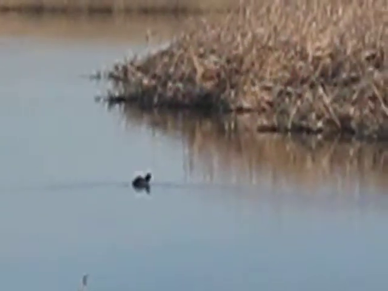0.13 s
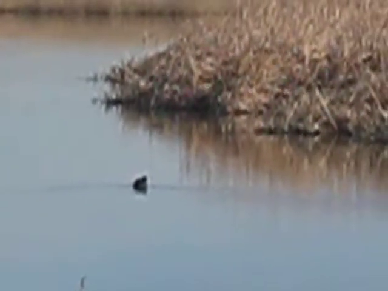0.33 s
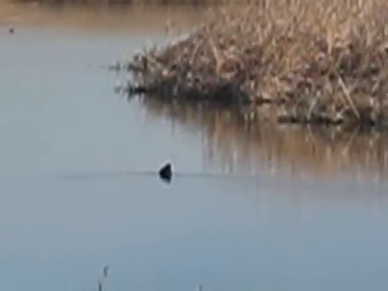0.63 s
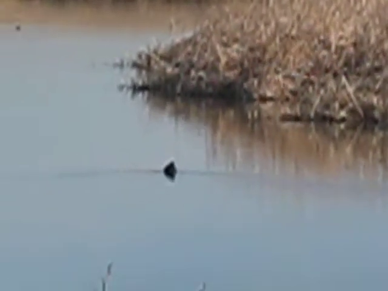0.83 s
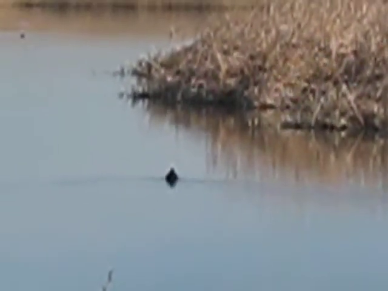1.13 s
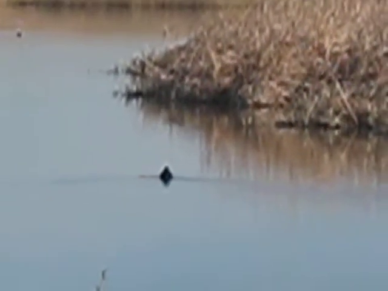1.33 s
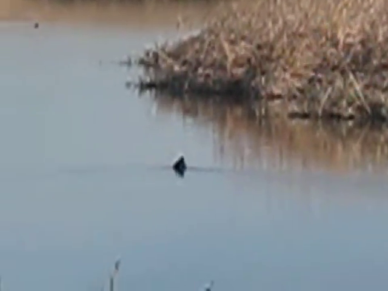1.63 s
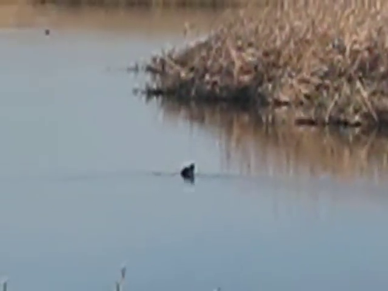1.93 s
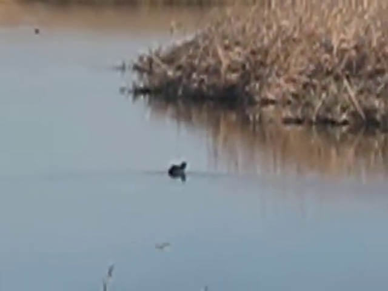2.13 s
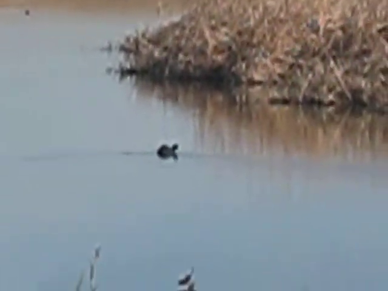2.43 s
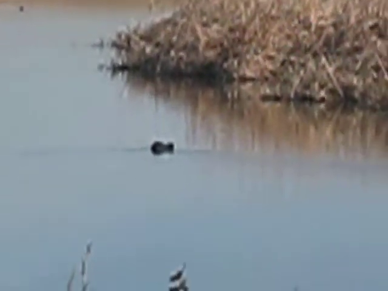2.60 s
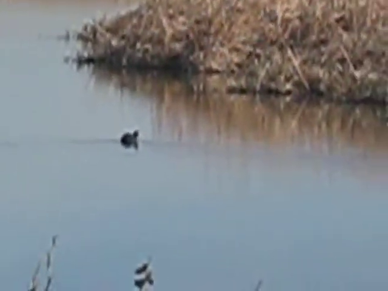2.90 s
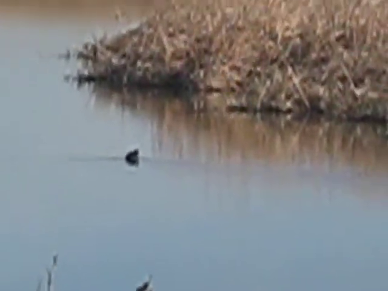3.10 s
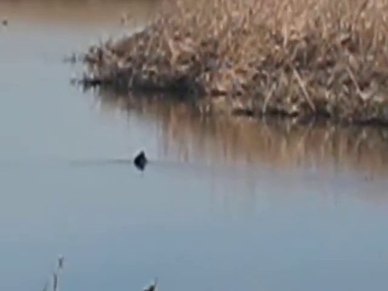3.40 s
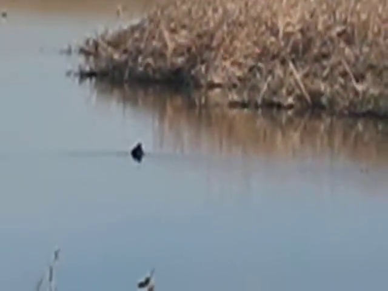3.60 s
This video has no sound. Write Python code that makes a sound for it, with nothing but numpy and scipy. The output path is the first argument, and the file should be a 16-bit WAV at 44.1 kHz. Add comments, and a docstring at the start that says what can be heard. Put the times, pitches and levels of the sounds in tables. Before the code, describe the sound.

A coot gives one short, hoarse call at about 2.5 seconds, falling in pitch and leaving a faint echo from the reed banks. Earlier, during the first 1.5 seconds, a distant waterbird gives faint, quick chirps in pairs. Throughout, until the end near 4 seconds, light gusts make a hollow rumble at the microphone, over a low wavering hum and a thin steady hiss.

```python
"""On open water, a coot gives one short, hoarse, falling call that echoes off the water and the reed bank. Its
voice is a stack of shaky tones mixed with a rasp of air. Another waterbird chirps faintly far away. Light gusts
make a hollow rumble at the microphone, over a low wavering hum and a thin steady hiss."""
import sys
import numpy as np
from scipy import signal
from scipy.fft import rfft, irfft, next_fast_len
from scipy.io import wavfile
from scipy.ndimage import map_coordinates

SR = 44100
rng = np.random.default_rng(int(sys.argv[2]) if len(sys.argv) > 2 else 0)


def output_pcm(signal):
    """Save a mono or channel-first signal as 16-bit PCM at the path in sys.argv[1].

    Samples are clipped to [-1, 1] before scaling.
    """
    pcm = np.clip(np.atleast_2d(signal).T, -1, 1) * 32767
    wavfile.write(sys.argv[1], SR, np.round(pcm).astype(np.int16))


N = 165375
TOP_HZ = 15780  # nothing higher than this is heard


def coot():
    """A falling voice of hoarse harmonics (multiples of the pitch), with air let through once a cycle."""
    # The voice's fall. Each row: time in seconds, pitch in Hz.
    pitch = [(2.502, 1195), (2.513, 1285), (2.523, 1205), (2.537, 1281), (2.548, 1261), (2.558, 1199),
             (2.572, 1229), (2.586, 1168), (2.6, 1196), (2.618, 1090), (2.627, 1102), (2.64, 1038),
             (2.649, 1084)]
    # How harmonics 1, 2 and 3 flutter. Each row: time in seconds, level in dB before a small trim.
    first = [(2.503, -32.5), (2.51, -27), (2.516, -39), (2.523, -19.5), (2.533, -35.5), (2.539, -19.5),
             (2.55, -52), (2.556, -21), (2.566, -42), (2.574, -29.5), (2.586, -24), (2.594, -27.5),
             (2.61, -23.5), (2.63, -42), (2.636, -35), (2.646, -43)]
    second = [(2.503, -32.5), (2.513, -27.5), (2.528, -40), (2.538, -40), (2.578, -46), (2.585, -33),
              (2.599, -49), (2.607, -33.5), (2.614, -27), (2.619, -43), (2.626, -27), (2.63, -43),
              (2.638, -29), (2.646, -29.5)]
    third = [(2.503, -52), (2.521, -59), (2.536, -43.5), (2.549, -64), (2.557, -43), (2.565, -64),
             (2.573, -52), (2.599, -56), (2.608, -60), (2.617, -48), (2.627, -66), (2.642, -46)]
    # The highest harmonics. Each row: harmonic number, dB added to upper_db.
    upper = [(4, -13), (5, -16.5)]
    # How much noise shakes each harmonic, lowest first.
    hoarseness = [.2, .45, .6, .55, .6]
    # The rasp of air. Each row: time in seconds, level in dB.
    rasp_levels = [(2.502, -39), (2.515, -45), (2.545, -53), (2.563, -48), (2.58, -47), (2.598, -45),
                   (2.62, -48), (2.64, -47)]
    # Harsh catches that open and close the call. Each row: time in seconds, level in dB.
    catch_peaks = [(2.503, -47), (2.641, -43)]
    # The tone colours of rasp and catches. Each row: frequency in Hz, relative level in dB.
    rasp_colour = [(500, -40), (1000, 3), (1550, 2), (2200, 11), (3000, -18), (4000, -14), (6000, -20),
                   (9000, -27)]
    catch_colour = [(700, -28), (1500, 2.5), (2100, 4), (3200, -10), (4100, -7), (5200, -13), (6500, -16),
                    (9000, -37)]
    start_s, end_s, attack_s, release_s, catch_width_s = 2.501, 2.649, .003, .0048, .0055
    jitter, shimmer_db, shakes_per_s, hoarse_per_s = .0162, .4, 260, 300
    t = clock()
    fade = np.clip((t - start_s) / attack_s, 0, 1) * np.clip((end_s - t) / release_s, 0, 1)
    phase = cycles(curves(pitch)[0] * (1 + jitter * wobble(shakes_per_s)))
    upper_db = -43 - 110 * np.maximum(t - start_s, 0)  # the call grows duller as it falls
    levels = [curves(first)[0] - 1, curves(second)[0] - 1.5, curves(third)[0] + .5]
    levels += [upper_db + db for _, db in upper]
    voice = np.zeros(N)
    for k, (db, share) in enumerate(zip(levels, hoarseness), 1):
        # The angle of this random number shakes the phase; its size shakes the level.
        shake = 1 + share * (wobble(hoarse_per_s) + 1j * wobble(hoarse_per_s))
        harmonic = tone(k * phase + np.angle(shake), db + shimmer_db * wobble(shakes_per_s))
        voice += np.abs(shake) ** .4 * harmonic
    air_pulses = unit(noise(rasp_colour) * (1 + .5 * np.cos(phase)))
    rasp = amp(curves(rasp_levels)[0]) * air_pulses
    catches = sum(amp(db) * np.exp(-.5 * ((t - s) / catch_width_s) ** 2) for s, db in catch_peaks)
    return fade * (voice + rasp + catches * noise(catch_colour))


def far_bird():
    """A distant bird gives short chirps whose pitch arches up and down."""
    # The chirps. Each row: middle in seconds, top pitch in Hz, base level in dB.
    chirps = [(.165, 1246, -54.5), (.284, 1240, -57.5), (.521, 1247, -57), (.65, 1282, -62),
              (.905, 1253, -59), (1.045, 1280, -64), (1.345, 1126, -62), (1.48, 910, -65)]
    # The tones in a chirp. Each row: harmonic number, dB added to the base level.
    harmonics = [(1, -8), (2, -4), (3, -10)]
    half_length_s, sag = .014, .055  # sag: share of pitch lost that far from the middle
    out = np.zeros(N)
    for middle_s, top_hz, level in chirps:
        away = ((clock() - middle_s) / half_length_s) ** 2
        swell = np.exp(-.5 * away)
        phase = cycles(top_hz * (1 - sag * np.minimum(away, 10)))
        out += swell * sum(tone(round(k) * phase, level + db) for k, db in harmonics)
    return out


def water_and_bank_echoes(sound):
    """The water close by and a far reed bank scatter the sound back; the treble dies first."""
    # The water and the far bank. Each row: delay in seconds, level in dB, treble limit in Hz.
    banks = [(0.011, -12, 4500), (.25, -25.5, 1100)]
    # How long an echo lasts. Each row: frequency in Hz, seconds to fade by 60 dB.
    fade_times = [(500, .6), (1200, .6), (2100, .29), (5000, .2)]
    out = np.zeros(N)
    for delay_s, level_db, limit_hz in banks:
        bands_hz, t, scatter = signal.stft(rng.standard_normal(SR), SR, nperseg=256)
        fade = amp(-60 * t / along(fade_times, bands_hz)[:, None])
        tail = signal.istft(scatter * fade, SR, nperseg=256)[1]
        delayed_tail = np.pad(tail / np.linalg.norm(tail), (int(delay_s * SR), 0))
        dulled = filtered(sound, lambda hz: 1 / np.hypot(1, (hz / limit_hz) ** 2))
        out += amp(level_db) * signal.fftconvolve(dulled, delayed_tail)[:N]
    return out


def wind():
    """Gusts swell in three hollow resonances over a steady bed of air."""
    # Where the resonances drift. Each row: time in seconds, then low, middle and high centre in Hz.
    centres = [(0, 323.5, 628, 719), (.2, 350, 615, 738), (.65, 279.9, 600, 850), (.85, 320.8, 592.3, 897),
               (1.149, 279.9, 585, 893.3), (1.5, 307.1, 567.5, 855.6), (2.3, 290, 568, 808),
               (3.3, 290.2, 535, 784.5), (3.75, 284.5, 515, 770)]
    # Their widths in Hz, from low to high.
    widths = [139, 146, 174]
    # The strength of each one. Each row: time in seconds, level in dB before a small trim.
    rumble = [(0.0, -37), (0.65, -42.5), (0.83, -30), (0.99, -42), (1.12, -34.5), (1.3, -39), (1.45, -31.5),
              (1.95, -39), (2.6, -35.5), (3.44, -34.5), (3.5, -42.5), (3.59, -33.5), (3.75, -33.5)]
    gust = [(0.0, -43), (0.09, -49.5), (0.17, -34.5), (0.27, -43.5), (0.71, -48), (0.88, -30.5),
            (0.92, -40.5), (1.07, -30), (1.28, -45.5), (1.5, -30.5), (1.73, -45), (1.93, -37.5),
            (2.1, -44.5), (2.15, -37.5), (2.78, -43), (2.83, -34.5), (3.07, -45), (3.34, -30.5),
            (3.43, -42), (3.75, -32)]
    whistle = [(0.0, -63), (0.29, -56), (0.63, -59), (1.11, -42.5), (1.34, -56.5), (1.46, -44), (3.04, -49),
               (3.08, -41.5), (3.64, -43), (3.75, -46.5)]
    # The steady air. Each row: frequency in Hz, relative level in dB.
    air_colour = [(20, -18), (40, -4), (62, -6.5), (85, 0), (130, -2), (200, 3), (400, -11.5), (700, -5.5),
                  (1000, -13.5), (1250, -16.5), (1500, -29.5), (2500, -39)]
    air_db, flutter_db = -43, .72
    levels = [curves(rumble)[0] + .5, curves(gust)[0] - .5, curves(whistle)[0] - 1.5]
    gusts = sum(resonance(hz, width) * amp(db + flutter_db * wobble(per_s=12))
                for hz, width, db in zip(curves(centres), widths, levels))
    return gusts + amp(air_db) * noise(air_colour)


def resonance(centre_hz, width_hz):
    """A hollow ring: a narrow band of noise around a moving centre, with the deep bass turned down."""
    narrow = lambda hz: 1 / (1 + (2 * hz / width_hz) ** 2)
    slow_a, slow_b = [filtered(rng.standard_normal(N), narrow) for _ in range(2)]
    phase = cycles(centre_hz)
    ring = slow_a * np.cos(phase) + slow_b * np.sin(phase)
    bass_cut_hz = centre_hz.mean() / 2
    return unit(filtered(ring, lambda hz: hz ** 2 / np.hypot(hz ** 2, bass_cut_hz ** 2)))


def hum():
    """A low wavering hum with a weak tone an octave below."""
    # The hum's course. Each row: time in seconds, pitch in Hz, level in dB.
    course = [(0, 135, -46), (.2, 138, -42.5), (.5, 130, -48.5), (.68, 131, -40), (.8, 130, -69),
              (1.08, 127, -48.5), (1.17, 127, -44.5), (1.9, 129, -49.5), (2.8, 128, -48),
              (3.75, 129, -47.5)]
    hz, db = curves(course)
    phase = cycles(hz * (1 + .013 * wobble(per_s=18)))
    db = db + .73 * wobble(per_s=12)
    return tone(phase, db) + tone(phase / 2, db - 11.5)


def hiss():
    """A thin steady hiss with a faint regular ticking at the very top."""
    # The hiss's tone colour. Each row: frequency in Hz, relative level in dB.
    colour = [(300, -10), (1500, 11.5), (2500, 10), (4000, 7), (6000, 5), (7200, 4.5), (9000, 0.5),
              (11000, -0.5), (14000, -8.5), (15500, -7.5)]
    hiss_db, fizz_db = -58, -65.5
    ticks_per_s, decay_s, spread_db = 30, .002, 1.2
    since_tick = clock() % (1 / ticks_per_s)
    ticks = np.exp(-since_tick / decay_s) * amp(spread_db * wobble(ticks_per_s))
    fizz = unit(ticks * noise([(7000, -12), (14000, -6), (TOP_HZ, 0)]))
    return amp(hiss_db) * noise(colour) + amp(fizz_db) * fizz


def amp(db):
    """Turn decibels into a number to multiply by."""
    return 10 ** (np.asarray(db) / 20)


def unit(x):
    """Scale a sound to an average strength (rms) of 1."""
    return x / np.sqrt(np.mean(x ** 2) + 1e-20)


def along(points, hz):
    """Read between (Hz, value) points, with octaves evenly spaced."""
    frequencies, values = np.transpose(points)
    return np.interp(np.log(hz + 1), np.log(frequencies + 1), values)


def clock():
    """The time of every sample in seconds."""
    return np.arange(N) / SR


def curves(rows):
    """Join the rows with straight lines: one curve for each column after the time."""
    times, *columns = np.transpose(rows)
    return [np.interp(clock(), times, column) for column in columns]


def wobble(per_s):
    """A smooth curve through per_s random values a second."""
    return map_coordinates(rng.standard_normal(N // 8), [clock() * per_s], mode="wrap")


def filtered(x, response):
    """Turn each frequency in x up or down by response(hz)."""
    size = next_fast_len(N + SR // 2)
    return irfft(rfft(x, size) * response(np.fft.rfftfreq(size, 1 / SR)), size)[:N]


def noise(colour):
    """Noise of strength 1, shaped by (Hz, dB) points."""
    return unit(filtered(rng.standard_normal(N), lambda hz: amp(along(colour, hz))))


def cycles(hz):
    """The phase of a changing pitch: how far its wave has turned, in radians."""
    return 2 * np.pi * np.cumsum(hz) / SR


def tone(phase, db):
    """A pure tone with the given average (rms) level."""
    return np.sqrt(2) * amp(db) * np.sin(phase)


def scene():
    """Birds and their echoes over wind, hum and hiss."""
    birds = coot() + far_bird()
    return (birds + water_and_bank_echoes(birds) + wind() + hum() + hiss())[None]


def record(dry):
    """Cut a deep notch in the treble and remove everything above TOP_HZ."""
    notch_hz, width_hz = 7880, 1020
    notch = lambda hz: np.abs(hz - notch_hz) / np.hypot(hz - notch_hz, width_hz)
    return filtered(dry[0], lambda hz: notch(hz) * (hz < TOP_HZ))[None]


dry = scene()
out = record(dry)
output_pcm(out)
```